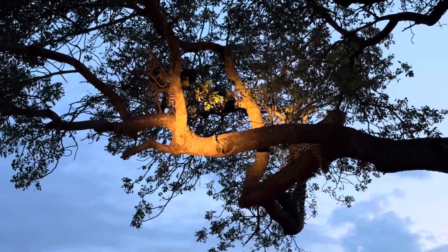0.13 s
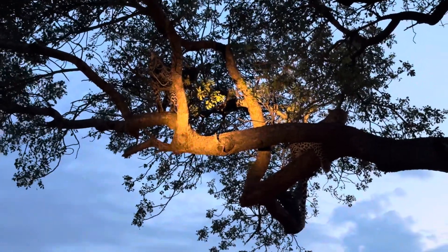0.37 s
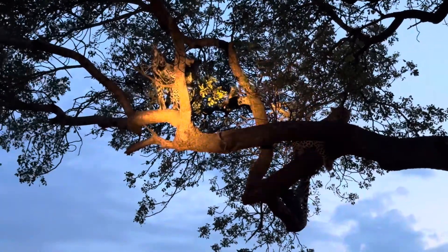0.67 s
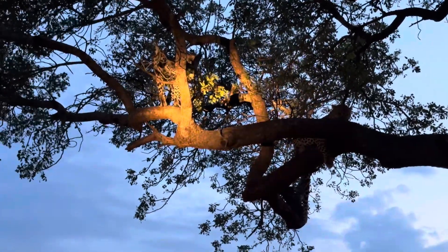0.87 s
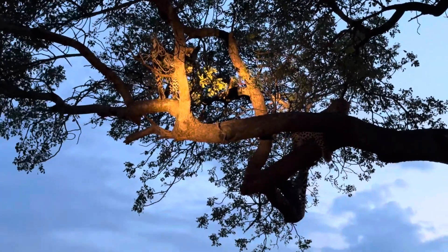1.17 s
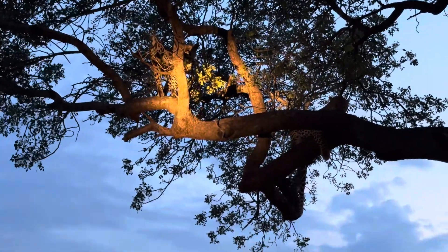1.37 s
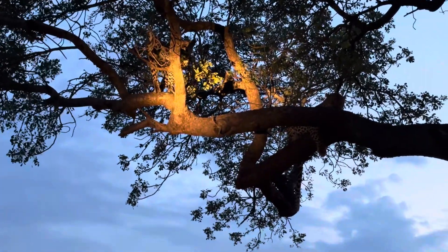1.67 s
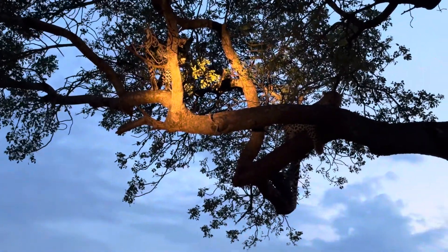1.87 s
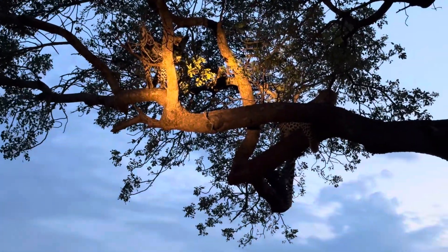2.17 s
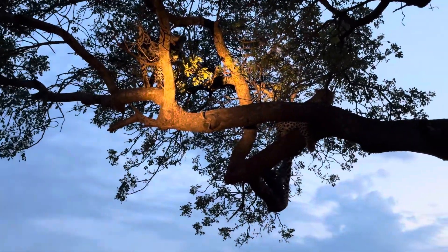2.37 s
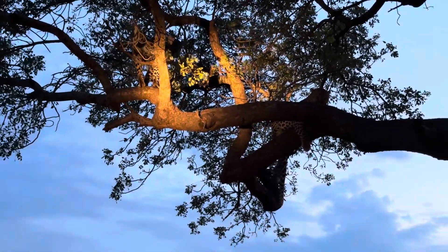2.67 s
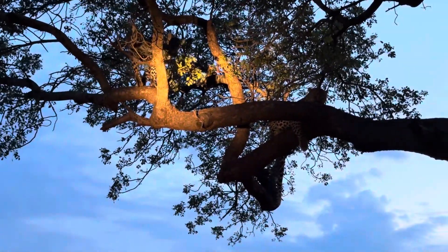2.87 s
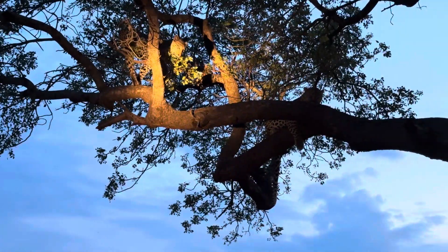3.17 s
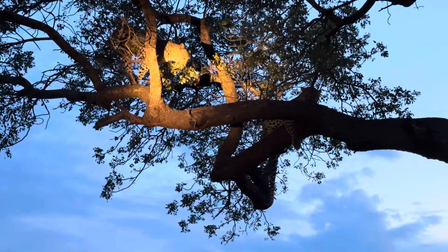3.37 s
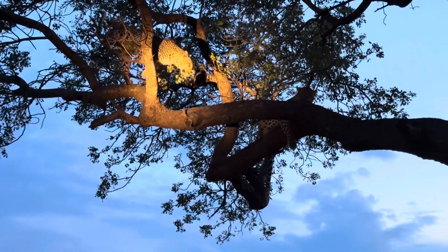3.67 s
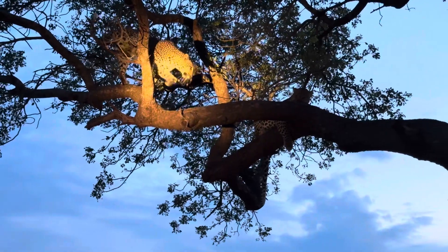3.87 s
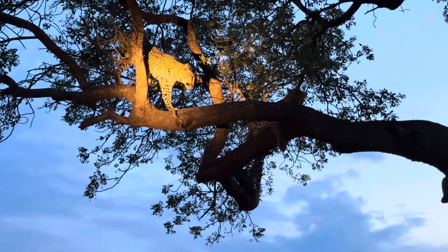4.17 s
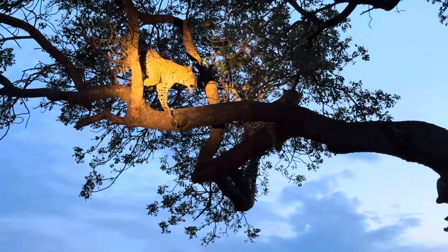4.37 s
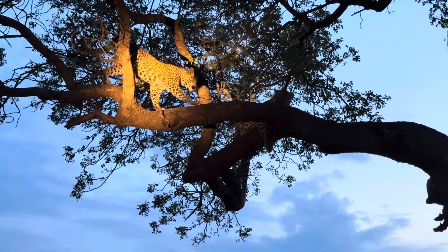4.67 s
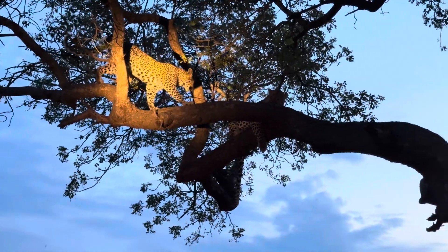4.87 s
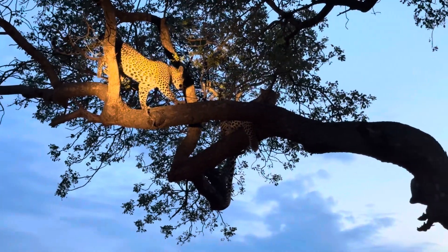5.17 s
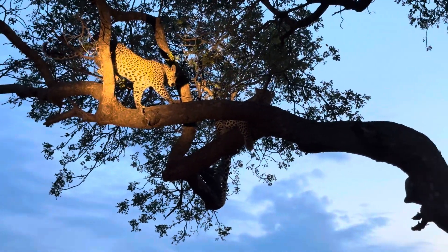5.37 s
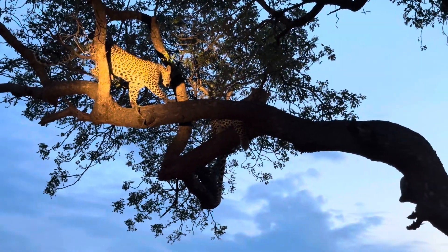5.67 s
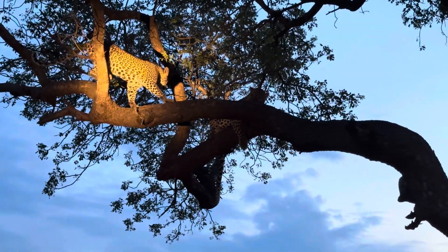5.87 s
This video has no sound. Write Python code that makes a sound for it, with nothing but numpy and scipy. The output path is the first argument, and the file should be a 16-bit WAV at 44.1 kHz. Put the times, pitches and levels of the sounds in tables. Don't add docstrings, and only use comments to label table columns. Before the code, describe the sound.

Outdoors at dusk, crickets and trills over soft buzzing; wind buffets, cloth rubs, then a big cat purrs deeply and another growls and snarls.

```python
import sys
import numpy as np
from scipy import signal
from scipy.fft import rfft, irfft
from scipy.io import wavfile
from scipy.ndimage import uniform_filter1d

SR = 44100
rng = np.random.default_rng(int(sys.argv[2]) if len(sys.argv) > 2 else 0)


def boost_factor(decibels):
    exponent = np.asarray(decibels, float) / 20
    return 10 ** exponent


def store_pcm(level_fs):
    pcm = np.round(np.clip(level_fs, -1, 1) * 32767).astype(np.int16)
    wavfile.write(sys.argv[1], SR, np.atleast_2d(pcm).T)


N = 265482

# (frequency [Hz], level [dB per Hz])
BREATH = [(200, 9), (380, 0.5), (620, -2), (930, -9), (1500, -10), (2600, -16), (5500, -16), (8000, -30.5)]
PUFF_T60_S, AIR_RISE_S = 0.084, .004


def evened(x):
    return x / np.sqrt(np.mean(x ** 2) + 1e-20)


def read(points, hz):
    f, value = np.transpose(points)
    return np.interp(np.log(hz + 1), np.log(f + 1), value)


def curve(rows, column):
    return np.interp(np.arange(N) / SR, [r[0] for r in rows], [r[column] for r in rows])


def add(mix, s, sound):
    part = mix[max(round(s * SR), 0):][:len(sound)]
    part += sound[:len(part)]


def colour(x, points):
    gain = boost_factor(read(points, np.fft.rfftfreq(x.shape[-1], 1 / SR)))
    return irfft(rfft(x) * gain, x.shape[-1])


def slow_noise(count, size):
    return evened(uniform_filter1d(rng.standard_normal(count), size=size))


def swells(rows, rise):
    t = np.arange(0, N + 64, 64) / SR
    power = 0
    for s, db, fade in rows:
        away = np.maximum((t - s) / fade, (s - t) / (rise * fade))
        power = power + boost_factor(db) ** 2 * np.exp(-2 * away ** 1.5)
    return np.interp(np.arange(N) / SR, t, np.sqrt(power))


def noise(points, patchy_db, same=None, size=1024):
    # (frequency [Hz], likeness [0-1])
    same_low = [(60, 0.1), (200, 1), (700, 0.41), (1400, 0.73), (2400, 0.99)]
    # (frequency [Hz], likeness [0-1])
    same_top = [(6500, 1), (10000, 1), (15000, .82)]
    frames, hz = 4 * N // size + 5, np.fft.rfftfreq(size, 1 / SR)
    a, b, c, d, patch = rng.standard_normal((frames, len(hz), 5)).T
    patch = evened(uniform_filter1d(uniform_filter1d(patch, size=10, axis=0), size=8, axis=1))
    like = np.clip(read(same_low + same_top, hz)[:, None] if same is None else same, -1, 1)
    left = a + 1j * b
    right = like * left + np.sqrt(1 - like ** 2) * (c + 1j * d)
    z = np.array([left, right]) * boost_factor(read(points, hz)[:, None] + patchy_db * patch)
    return evened(signal.istft(z, nperseg=size, noverlap=3 * size // 4)[1][:, :N])


def hush():
    # (frequency [Hz], level [dB per Hz])
    low = [(40, -50), (170, -29)]
    # (frequency [Hz], level [dB per Hz])
    air = [(300, -19), (600, -29.5), (1000, -34), (2000, -38.5), (3300, -40), (4050, -37.5), (4550, -72),
           (5400, -45.5), (6900, -42), (7750, -24), (8600, -28), (11200, -71)]
    # (frequency [Hz], level [dB per Hz])
    high = [(12500, -49), (14400, -48), (14750, -62)]
    return boost_factor(-73.5) * noise(low + air + high, 2.5)


def chorus():
    # (peak time [s], peak level [dB], fade [s])
    far_trills = [
        (.8, -82, .12),
        (1.15, -83, 0.079),
        (1.55, -86, 0.11),
        (3.5, -82.5, 0.18),
        (4.3, -81, 0.13),
        (5.62, -89, 0.14),
    ]
    band = [(3500, -25), (3900, -2), (4200, 0), (4520, -3), (4650, -12), (5150, -15), (5400, -35)]
    out = boost_factor(-80.5) * noise(band, 4.2)
    trill_band = [(4400, -35), (4650, -1), (5200, 0), (5400, -35)]
    out = out + swells(far_trills, 1.0) * noise(trill_band, 2.3)
    whine_hz = 4505 + 8.0 * slow_noise(N, 2000)
    return out + boost_factor(-96) * np.sqrt(2) * np.sin(2 * np.pi * np.cumsum(whine_hz) / SR)


def buzz():
    # (multiple of pulse rate, level [dB])
    harmonics = [(26, -20), (27, -4), (28, -8), (29, 0), (30, -2), (31, -7), (32, -7), (33, -16), (34, -18),
                 (35, -21)]
    out = np.zeros((2, N))
    for side in (1, -1, 1):
        rate_hz = 331.7 * (1 + .005 * slow_noise(N, 300))
        turns = np.cumsum(rate_hz) / SR + rng.random()
        lines = sum(boost_factor(db) * np.cos(2 * np.pi * order * turns + order ** 2) for order, db in harmonics)
        out += lines * np.array([[1], [.6]])[::side]
    return boost_factor(-82) * evened(out)


def whistles():
    # (start [s], length [s], from [Hz], to [Hz], level [dB])
    glides = [(0, 0.06, 2860, 2670, -84), (0.18, .1, 2710, 3070, -87), (0.277, .04, 3000, 2880, -85),
              (0.294, 0.077, 2750, 2940, -87), (0.348, .045, 2960, 2690, -83),
              (3.647, 0.047, 1600, 1460, -81), (3.765, 0.025, 1600, 1690, -73.5),
              (3.767, 0.021, 1900, 1850, -79), (3.808, 0.025, 1720, 2000, -76),
              (3.855, 0.028, 1900, 2110, -85), (4.07, .03, 2020, 2170, -83), (5.129, .045, 2650, 2470, -89),
              (5.758, .06, 2620, 2440, -81)]
    out = np.zeros(N)
    for s, length, from_hz, to_hz, db in glides:
        t = np.arange(0, length, 1 / SR)
        waver = 1 + .35 * slow_noise(5000, 200)[:len(t)]
        mean_hz = from_hz + (to_hz - from_hz) * t / (2 * length)
        tone = np.sin(2 * np.pi * t * mean_hz) * signal.windows.tukey(len(t), .6)
        add(out, s, boost_factor(db) * waver * tone)
    return out


def crickets():
    # (start [s], chirps, spacing [s], strokes per chirp)
    phrases = [
        (.005, 5, .2133, 2),
        (1.088, 3, .229, 3),
        (1.786, 4, .2347, 3),
        (2.732, 3, .24, 3),
        (3.456, 4, .2603, 4),
        (4.496, 6, .2658, 4),
    ]
    out, t = np.zeros(N), np.arange(0, .022, 1 / SR)
    for s, strokes in [(s + k * gap, n) for s, chirps, gap, n in phrases for k in range(chirps)]:
        for k in range(round(strokes)):
            for lag_s, hz, db in ((-.011, 8030, -70), (.108, 7720, -74)):
                phase = 2 * np.pi * hz * t * (1.014 - .6 * t) + 2 * np.pi * rng.random()
                tone = np.sin(phase) * abs(np.sin(np.pi * t / t[-1]))
                add(out, s + lag_s + .0305 * k, boost_factor(db + 1.2 * rng.standard_normal()) * tone)
    return out


def trills():
    # (start [s], length [s], first stroke rate [1/s])
    songs = [
        (.029, .285, 56.6),
        (.399, .23, 59.2),
        (1.87, .25, 60.7),
        (2.1185, .255, 57.5),
        (2.8, .2, 60.1),
        (2.966, .165, 57.5),
        (3.9775, .215, 60.2),
        (5.0143, .2, 60.4),
    ]
    # (level [dB], top pitch [Hz], rise [s])
    voices = [(-63, 5050, .07), (-65.5, 4830, .1), (-64.5, 4950, 0.14), (-60, 5040, 0.097),
              (-69.5, 4950, .11), (-71.5, 5090, 0.037), (-64, 4920, 0.088), (-70, 4930, 0.039)]
    # (lag [s], level [dB])
    echoes = [(0, 0), (.0088, -12), (.0265, -14), (.047, -16)]
    out = np.zeros(N)
    for (s, length, rate), (db, hz, rise_s) in zip(songs, voices):
        t = np.arange(0, length, 1 / SR)
        count = t * rate * (1 - .1 * t)
        stroke = (count + .5) % 1 - .5
        level_db = db - 18 * np.maximum(1 - t / rise_s, 0)
        level_db = level_db - 20 * np.maximum(1 - (length - t) / .035, 0)
        climb = 1 - (1 - .905) * np.exp(-2.5 * (t / rise_s) ** 1.5)
        pitch_hz = hz * climb * (1.0 - .12 * stroke - .52 * np.maximum(stroke, 0) ** 2)
        scrape = slow_noise(len(t), 90)
        uneven = boost_factor(1.2 * rng.standard_normal(40))[np.round(count).astype(int)]
        gate = np.exp(-(stroke / .27) ** 2) * (1 + .2 * scrape) * uneven
        tone = evened(gate * np.sin(2 * np.pi * np.cumsum(pitch_hz) / SR))
        for lag_s, echo_db in echoes:
            add(out, s + lag_s, boost_factor(level_db - 2.5 + echo_db) * tone * signal.windows.tukey(len(t), .1))
    return out


def wind():
    # (time [s], peak level [dB], frequency [Hz], cycles)
    thumps = [
        (0.718, -37.5, 68, 1.84),
        (0.946, -29.5, 74.5, 2.9),
        (0.992, -35.5, 61.6, 2.6),
        (1.854, -33.5, 82, 1.8),
        (2.394, -42, 62.7, 3.2),
        (2.812, -47.5, 51.5, 3.9),
        (2.977, -40.5, 71.6, 3.13),
        (3.182, -46.5, 52.6, 3.2),
        (3.237, -44.5, 55, 3.1),
    ]
    # (time [s], peak level [dB], frequency [Hz], cycles)
    knocks = [(3.722, -47.5, 150, 3.6), (5.207, -52.5, 200, 1.9), (4.83, -50.5, 330, 2.7),
              (5.513, -46, 129, 3.1), (0.056, -52.5, 520, 5.9), (0.764, -38.5, 354, 2.6),
              (0.782, -33.5, 467, 1.8), (0.894, -51.5, 308, 2.6), (1.669, -60, 667, 3),
              (1.672, -61, 1230, 5.6), (3.238, -55, 348, 7.9), (3.607, -58.5, 457, 4.1),
              (3.972, -56, 412, 3.8)]
    # (time [s], peak level [dB], frequency [Hz], cycles)
    peeps = [
        (1.919, -74, 1160, 13),
        (2.059, -69.5, 1150, 12),
        (4.558, -39, 1335, 6.8),
        (4.562, -53.5, 1485, 23),
        (5.866, -56.5, 710, 2),
        (4.878, -66, 2400, 30),
        (4.88, -71, 1880, 46),
        (5.525, -69, 3800, 35),
    ]
    # (peak time [s], peak level [dB], fade [s])
    gusts = [(.38, -48.5, 0.11), (.55, -47, 0.051), (.73, -43.5, 0.095), (.97, -39.5, 0.056),
             (1.23, -55, 0.059), (1.6, -58, 0.041), (1.87, -53.5, 0.14), (2.04, -57, 0.082),
             (2.41, -49, 0.023), (2.57, -60.5, 0.045), (2.72, -56, 0.044), (2.83, -53.5, 0.021),
             (2.99, -57.5, 0.076), (3.25, -60, 0.067), (3.44, -52.5, 0.094), (3.6, -57, 0.23),
             (3.97, -39.5, 0.0095), (4.13, -51, 0.12), (4.46, -46.5, 0.085), (4.64, -47.5, 0.1),
             (4.97, -61.5, 0.17), (5.27, -59.5, 0.048), (5.6, -63, 0.034), (5.99, -48, 0.026)]
    # (peak time [s], peak level [dB], fade [s])
    flurries = [
        (.1, -57, 0.44),
        (.85, -55, 0.18),
        (1.2, -61.5, 0.14),
        (1.43, -62.5, 0.076),
        (3.6, -83, 0.13),
        (4.4, -55, 1),
        (5.3, -59, 0.091),
    ]
    rumble_band = [(20, -40), (32, -18), (45, -2), (62, 1), (85, -5), (110, -21), (140, -38), (600, -70)]
    rumble = noise(rumble_band, 2.5, same=.45, size=2048)
    flutter_band = [(60, -25), (105, -2), (160, 0), (215, -15), (450, -25), (900, -42), (3000, -80)]
    flutter = noise(flutter_band, 2.5, same=.5, size=2048)
    hits = np.zeros(N)
    for s, db, hz, cycles in thumps + knocks + peeps:
        t = np.arange(0, cycles / hz, 1 / SR)
        turns = hz * t * (1 + 0.95 / cycles * (1 - t / t[-1]))
        add(hits, s, boost_factor(db) * np.sin(2 * np.pi * turns) * abs(np.sin(np.pi * t / t[-1])) ** 2.4)
    lull_db, eddy_db, rise = -63.5, -74.5, 0.72
    eddies = boost_factor(eddy_db) * np.outer([1, -1], flutter[0, ::-1])
    return (boost_factor(lull_db) + swells(gusts, rise)) * rumble + swells(flurries, rise) * flutter + eddies + hits


def snaps():
    # (time [s], peak level [dB], brightness [dB per octave], tail t60 [s])
    cracks = [(0.7855, -56, 32, 0.13), (3.2188, -45.5, -6.5, 0.027), (3.2225, -39, 0, 0.056),
              (3.2285, -47, 5, 0.025), (3.2318, -50, -1, 0.11), (3.2948, -48.5, 8, 0.05),
              (3.09, -62, 8, 0.033), (3.507, -65, 6, .03), (3.963, -52, 7, 0.068), (4.3945, -63, -1, 0.11),
              (4.495, -41, -9, 0.17), (4.512, -49.5, -24, 0.034), (4.53, -61, 1, 0.03),
              (4.536, -57, 10, 0.027), (4.5434, -46, 2, 0.12), (4.5575, -39.5, 1, 0.051),
              (4.564, -39.5, 29, 0.15), (5.874, -70, 6, .03)]
    out, t = np.zeros(N), np.arange(6000) / SR
    for s, db, slope_db, t60 in cracks:
        dull_db = min(slope_db, 0)
        spectrum = [(300, -8 - 3 * slope_db), (1100, -3 * slope_db), (6500, 0), (10500, dull_db - 6),
                    (16000, min(2 * slope_db, 0) - 7)]
        hiss = evened(colour(rng.standard_normal(len(t)), spectrum))
        grain = evened(uniform_filter1d(rng.exponential(1, len(t)) ** 2, size=40))
        crack, crumble = boost_factor(-60 * t / 0.011), grain * boost_factor(-15.5 - 60 * t / t60)
        add(out, s - .0005, boost_factor(db) * hiss * np.minimum(t / .001, 1) ** 2 * (crack + crumble))
    return out


def rustle():
    # (peak time [s], peak level [dB], fade [s])
    rubs = [
        (.8, -68.5, 0.049),
        (.95, -67, 0.095),
        (1.035, -61, 0.046),
        (1.17, -63.5, 0.098),
        (1.355, -59.5, 0.072),
        (1.9, -78, 0.68),
        (2.4, -76, 0.045),
        (3.23, -59, 0.025),
        (3.67, -77.5, 0.17),
        (4.57, -57.5, 0.029),
    ]
    # (peak time [s], peak level [dB], fade [s])
    shakes = [(1.0, -81, 0.17), (1.35, -77, 0.029), (3.09, -73, 0.11), (3.25, -68, 0.11),
              (3.41, -73, 0.083), (3.53, -79, 0.064), (3.66, -78.5, 0.14), (3.97, -78, 0.18),
              (4.57, -68.5, 0.074), (5.42, -79, 0.044), (5.87, -80, 0.052)]
    # (frequency [Hz], level [dB per Hz])
    dull_band = [(200, 14.5), (700, 9.5), (1130, 1), (1360, 8.5), (1650, -1.5), (3000, -10), (6000, -10),
                 (15000, -61)]
    # (frequency [Hz], level [dB per Hz])
    bright_band = [(1500, -6), (4000, -1.5), (7000, 2.5), (10000, 3.5), (12000, -11), (14300, -2),
                   (15300, 3)]
    slips = boost_factor(0.46 * evened(uniform_filter1d(rng.exponential(1, N) ** 2, size=160) - 2))
    dull = swells(rubs, 0.8) * noise(dull_band, 3.3, size=512)
    bright = boost_factor(4.0) * swells(shakes, 0.39) * noise(bright_band, 2.5, size=512)
    return (dull + bright) * evened(slips)


def ring(modes, db, rise=0.001):
    t, out = np.arange(4000) / SR, 0
    for hz, t60, mode_db, breathy in modes:
        shake = uniform_filter1d(rng.standard_normal((2, len(t))), size=130)
        shake = evened(uniform_filter1d(shake, size=130))
        hz = hz * (1 + .013 * (hz > 500) * rng.standard_normal())
        swell = (1 - np.exp(-t / (rise * (200 / hz) ** .45))) ** 2 * boost_factor(-60 * t / t60)
        tone = (1 - breathy + breathy * (shake[0] + 1j * shake[1])) * np.exp(2j * np.pi * hz * t)
        out = out + boost_factor(db + mode_db) * tone.imag * swell / swell.max()
    return out


def purr():
    # (time [s], rate [1/s])
    pace = [
        (3.5, 16),
        (3.555, 21.803),
        (3.761, 18.24),
        (4.542, 21.241),
        (5.2, 17.622),
    ]
    # (time [s], effort [dB], mouth opening [dB], rasp [dB])
    course = [
        (3.5, -54, -44, -33),
        (3.75, -48.5, -30.5, -43),
        (4.02, -43, -33, -48),
        (4.15, -48.5, -30, -37),
        (4.33, -40.5, -22.5, -31),
        (4.55, -39.5, -14.5, -37.5),
        (4.8, -40, -19, -21),
        (5.05, -42.5, -19.5, -26),
        (5.2, -47, -28, -23.5),
    ]
    # (time [s], chest [dB], mouth [dB], rasp [dB])
    accents = [(3.555, 4.5, -4, -2), (3.605, -1, 0, 0), (3.655, -2, 1, 5), (3.7, -2, 8, 1),
               (3.75, 4, 8.5, 10), (3.91, 0.5, -5, -3), (4.37, 0, 4.5, 0.5), (4.42, -2.5, -25, 10),
               (4.465, 4.5, 0.5, 9.5), (4.605, 0, 2.5, 6), (4.655, -1, -4.5, 1), (4.75, -0.5, 6.5, 5.5),
               (4.8, -2, 7.5, 9), (4.855, -1.5, 2, 3), (4.905, -5.5, 3.5, 3.5), (4.958, -3.5, -14, 1),
               (5.01, 1.5, 4.5, -0.5), (5.065, 1.5, 0.5, -1), (5.118, -1.5, 7.5, 5.5), (5.175, 0, -6, -6),
               (4.27, 1.5, 1, 1), (4.32, 0, 3, 0.5), (4.7, -0.5, -0.5, 3)]
    # (frequency [Hz], ring t60 [s], level [dB], breathiness [0-1])
    mouth_modes = [(354, 0.039, -0.5, 0), (1217, 0.12, -12.5, 0.37), (568, 0.18, -4.5, 0.73)]
    # (frequency [Hz], ring t60 [s], level [dB], breathiness [0-1])
    rasp_modes = [(2450, 0.053, 3, 0.6), (2740, 0.13, 4, 0.34), (3440, 0.03, -21, 0.46),
                  (1550, 0.3, -5.5, 0.29), (1850, 0.012, -1, 0.93), (3630, 0.037, 7.5, 0.76),
                  (5730, 0.02, -6, 0.96)]
    uneven_db, uneven_mouth_db, uneven_chest, uneven_mouth = 1.0, 1.8, .018, .04
    slack_hz, chest_hz, sag_hz_per_s, tense_at_s = 140.7, 183.4, 5.1, 3.73
    out, t = np.zeros(N), np.arange(N) / SR
    sounding = (t >= pace[0][0]) * (t < pace[-1][0])
    count = np.cumsum(curve(pace, 1) * sounding) / SR - .018
    slaps = np.flatnonzero(np.diff(np.floor(count)))
    levels_db = np.array([curve(course, k)[slaps] for k in range(1, 4)])
    for s, *accent_db in accents:
        harder = np.arange(len(slaps)) == np.argmin(abs(t[slaps] - s))
        levels_db = levels_db + np.outer(accent_db, harder)
    puff_t = t[:2048]
    for s, (db, mouth_db, rasp_db), chance in zip(t[slaps], levels_db.T, rng.standard_normal((len(slaps), 5))):
        hz = chest_hz - sag_hz_per_s * (s - tense_at_s) if s > tense_at_s else slack_hz
        hz = hz * (1 + uneven_chest * chance[0])
        mouth_hz = 737 + 5.5 * (mouth_db + 21.0)
        mouth_hz = mouth_hz * (1 + uneven_mouth * chance[1])
        db = db + uneven_db * chance[2]
        mouth_db, rasp_db = [mouth_db, rasp_db] + uneven_mouth_db * chance[3:]
        chest_modes = [(hz, .062, 1.5, .12), (2 * hz, .05, -21, .4)]
        add(out, s - .005, ring(chest_modes, db, rise=0.011))
        jaws = ring([(mouth_hz, .065, 2.5, .4)] + mouth_modes, db + mouth_db - 3.5, rise=0.0025)
        shifted = [(f * (1 + uneven_mouth / 2 * chance[1]), *rest) for f, *rest in rasp_modes]
        add(out, s - .0075, jaws + ring(shifted, db + rasp_db - 11.0))
        puff = evened(colour(rng.standard_normal(2048), BREATH)) * np.minimum(puff_t / AIR_RISE_S, 1)
        puff = puff * (boost_factor(-60 * puff_t / PUFF_T60_S) + boost_factor(-17) * np.hanning(2048))
        add(out, s - .007, boost_factor(db + (mouth_db + rasp_db) / 2 - 1) * puff)
    return out


def growl_and_snarl():
    # (time [s], chest peak [dB], throat [dB], mouth [dB], nose [dB])
    growl = [(5.344, -70, -62, -68, -74), (5.356, -50.5, -34.5, -31.5, -60.5), (5.366, -75, -34, -59, -84),
             (5.378, -35.5, -41.5, -74, -79), (5.405, -67, -49, -47, -60.5), (5.42, -58, -52, -68, -84),
             (5.385, -72, -60, -73, -71), (5.444, -38, -48, -58, -68.5), (5.505, -62, -81, -59.5, -80),
             (5.544, -42.5, -64, -59, -70.5), (5.589, -48, -45, -55, -70), (5.612, -66, -55, -64, -80),
             (5.627, -40, -45, -56, -90), (5.68, -64, -76, -61.5, -84), (5.697, -81, -47.5, -68, -93),
             (5.714, -38, -51.5, -60.5, -72), (5.752, -83, -72, -60, -75), (5.798, -44, -66, -70, -81)]
    # (time [s], chest peak [dB], throat [dB], mouth [dB], rasp [dB])
    snarl = [
        (5.907, -65, -67, -53, -67),
        (5.917, -38, -34.5, -64, -55.5),
        (5.939, -39, -63, -55, -50),
        (5.948, -37, -69, -53, -61),
        (5.96, -41, -48, -68, -58),
        (5.977, -45, -59, -74, -60),
        (5.992, -54, -43.5, -43.5, -46.5),
        (6.004, -39.5, -66, -83, -68),
    ]
    # (frequency [Hz], ring t60 [s], level [dB], breathiness [0-1])
    growl_tract = [
        [(191, 0.043, 3.5, 0.15), (356, .06, -5, 0.16)],
        [(386.5, 0.092, -2.5, 0.14), (624, 0.065, -18, 0.63)],
        [(919, 0.046, 0, 0.37), (1070, 0.019, -26, 0.82)],
        [(1464, 0.14, 2.5, 0.35), (1630, 0.056, -15, 0.55), (2240, .07, -8, 0.69), (2650, 0.065, -1, .6),
         (4100, 0.033, -22, 1)],
    ]
    # (frequency [Hz], ring t60 [s], level [dB], breathiness [0-1])
    snarl_tract = [
        [(115, 0.046, -3.1, 0.42), (200, 0.03, 0, 0.39)],
        [(329, 0.081, 0.0041, 0.3)],
        [(1516, 0.059, -2, .4), (926, 0.069, -15.5, 0.55), (1850, 0.038, -22, 0.47)],
        [(2305, 0.088, -5.5, 0.48), (2655, 0.027, -0.5, 0.91), (3000, 0.018, -6, 0.85), (4670, .03, -18.5, .9)],
    ]
    # (frequency [Hz], ring t60 [s], level [dB], breathiness [0-1])
    nose_first = [(1615, 0.078, 2.5, 0.28), (1440, 0.054, -8, 0.8), (2290, .06, -7, 0.47),
                  (3270, 0.042, -11, .7), (4200, .04, -9.5, 0.48)]
    nose_drops_s = 5.48
    out, t = np.zeros(N), np.arange(2048) / SR
    for rows, tract in ((growl, growl_tract), (snarl, snarl_tract)):
        for s, *levels_db in rows:
            parts = tract[:3] + [nose_first if s < nose_drops_s else tract[3]]
            add(out, s - .001, sum(ring(modes, db, rise=.006) for modes, db in zip(parts, levels_db)))
            burst = evened(colour(rng.standard_normal(len(t)), BREATH)) * np.minimum(t / AIR_RISE_S, 1)
            add(out, s, boost_factor(max(levels_db[2:]) - 21 - 60 * t / PUFF_T60_S) * burst)
    return out


def cats():
    # (frequency [Hz], width [Hz], level [dB])
    hollows = [(465, 35, -9), (775, 35, -5), (1035, 55, -8), (1330, 70, -6), (1750, 60, -7)]
    hz = np.fft.rfftfreq(N, 1 / SR)
    dip_db = sum(db * np.exp(-((hz - f) / width) ** 2) for f, width, db in hollows)
    return irfft(rfft(purr() + growl_and_snarl()) * boost_factor(dip_db), N)


def breath():
    # (peak time [s], peak level [dB], fade [s])
    breaths = [
        (5.4, -64.5, 0.067),
        (5.52, -69, 0.069),
        (5.6, -64, 0.079),
        (5.7, -65, 0.12),
        (5.97, -53, 0.045),
    ]
    rasp = boost_factor(2.5 * slow_noise(N, 250))
    return swells(breaths, 1.0) * evened(rasp * colour(rng.standard_normal(N), BREATH))


def foliage(x, t60):
    # (frequency [Hz], level [dB])
    leaves = [(150, -1), (400, -4), (1300, 4), (3000, 4), (6800, -3), (7800, -30), (8800, -30), (10500, -8)]
    t = np.arange(9000) / SR
    tail = rng.standard_normal((3, len(t))) * boost_factor(-60 * t / t60) * (t > .003)
    tail = colour(tail[:2] + .4 * tail[2], leaves)
    tail = tail / np.sqrt(np.sum(boost_factor(-120 * t / t60)))
    return signal.fftconvolve(x[None], tail, axes=1)[:, :N]


def scene():
    near = cats() + breath() + snaps() + crickets()
    far = trills() + whistles()
    scatter = boost_factor(-13) * foliage(near, .18) + boost_factor(-7.5) * foliage(far, .16)
    return chorus() + near + far + scatter + wind() + rustle() + buzz() + hush()


def top_cut(x):
    return signal.sosfilt(signal.butter(12, 16490, fs=SR, output="sos"), x)


def record(dry):
    # (frequency [Hz], phase [rad])
    port_phase = [(0, 0), (1000, .08), (1800, .15), (3000, .4), (4900, .35), (5500, 0), (6800, 0),
                  (7320, 1.3), (7700, 2.7), (7980, 3.12), (8300, 3.14), (8720, 3.12), (9390, 1.5),
                  (10200, .4), (13000, 0), (15700, -2.8)]
    hz = np.fft.rfftfreq(N, 1 / SR)
    turn = np.exp(.5j * read(port_phase, hz))
    edge = boost_factor(read([(15, -24), (42, 0), (15650, 0), (15900, -22), (16400, -30), (17000, -60)], hz))
    mix = irfft(rfft(dry) * edge * np.array([turn, 1 / turn]), N)
    return top_cut(mix)


dry = scene()
out = record(dry)
store_pcm(out)
```